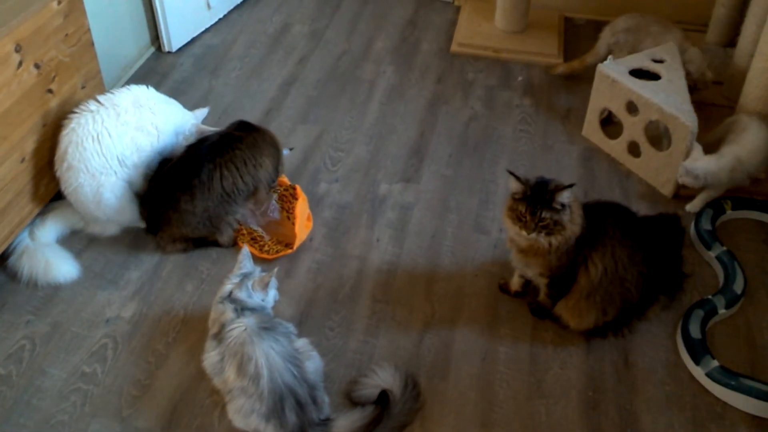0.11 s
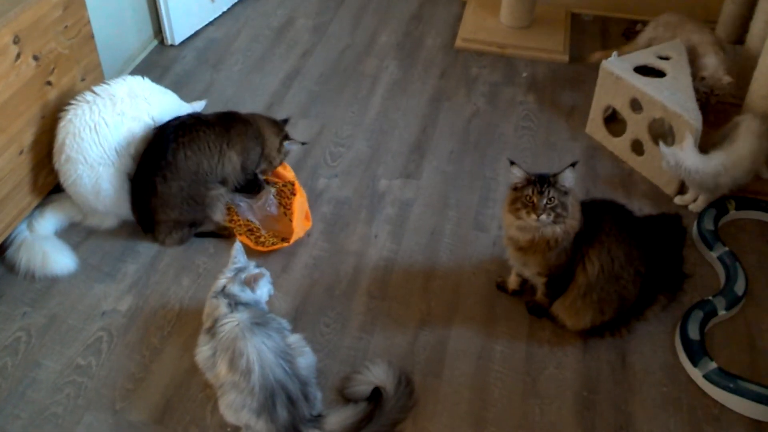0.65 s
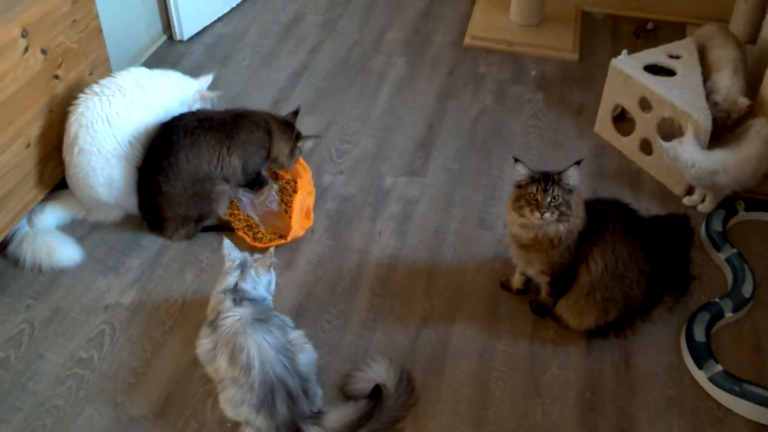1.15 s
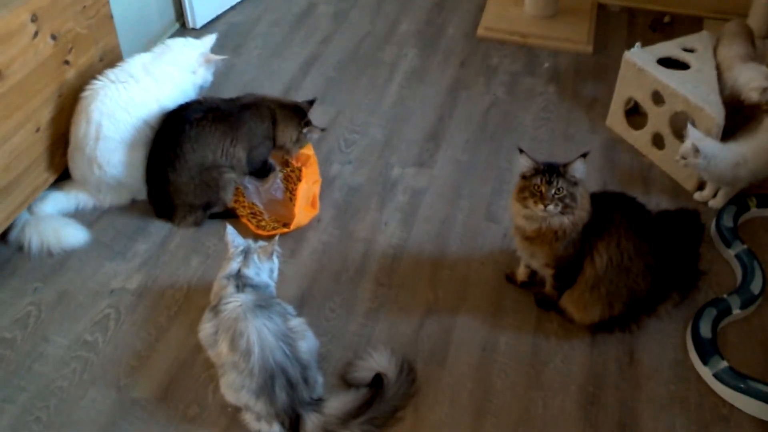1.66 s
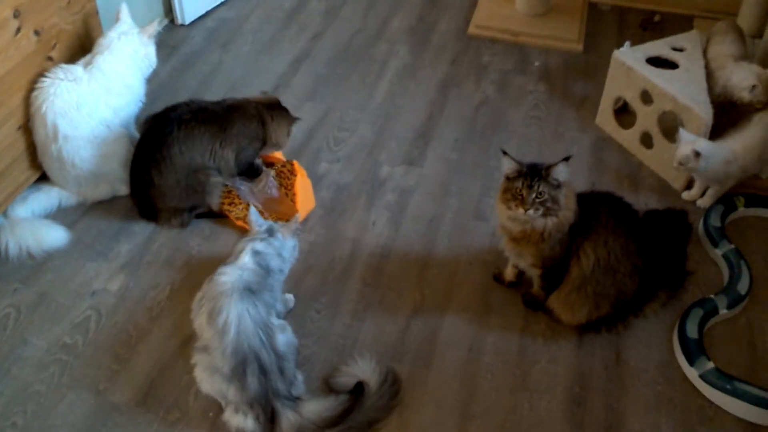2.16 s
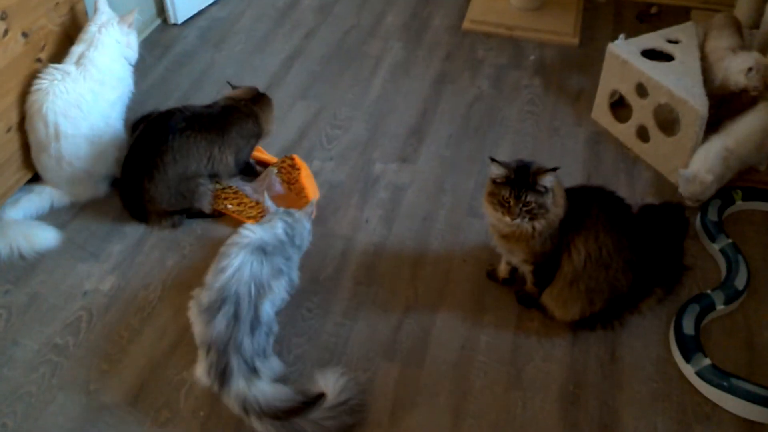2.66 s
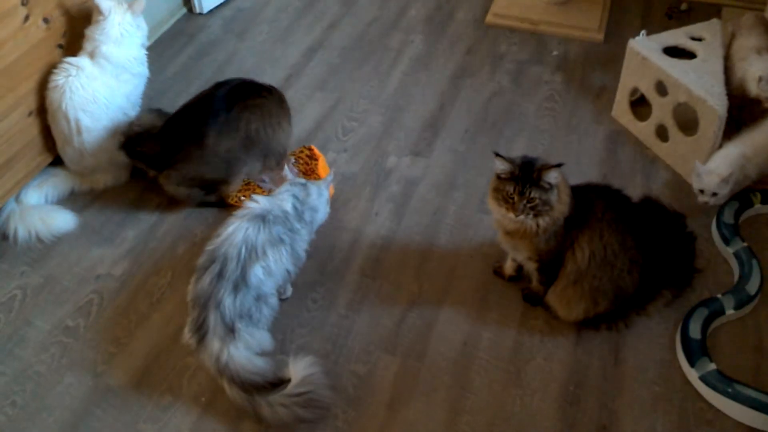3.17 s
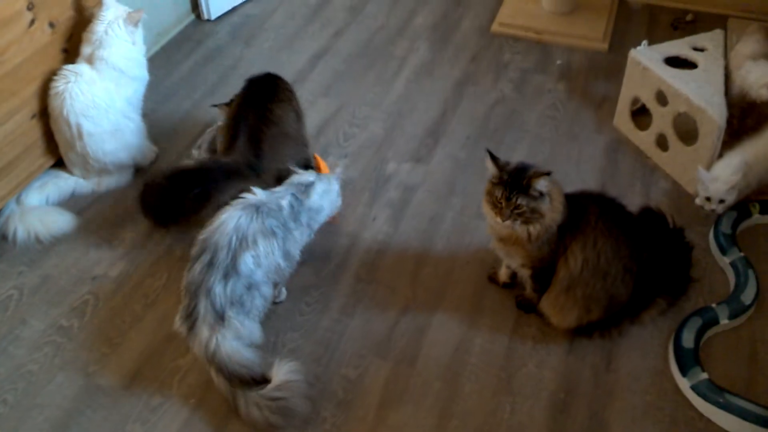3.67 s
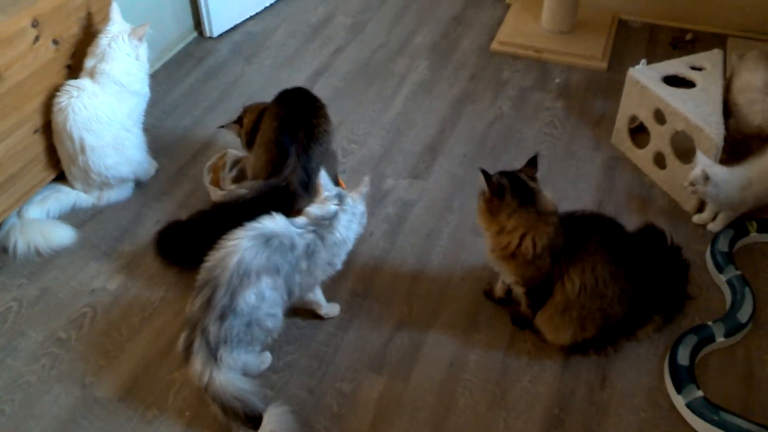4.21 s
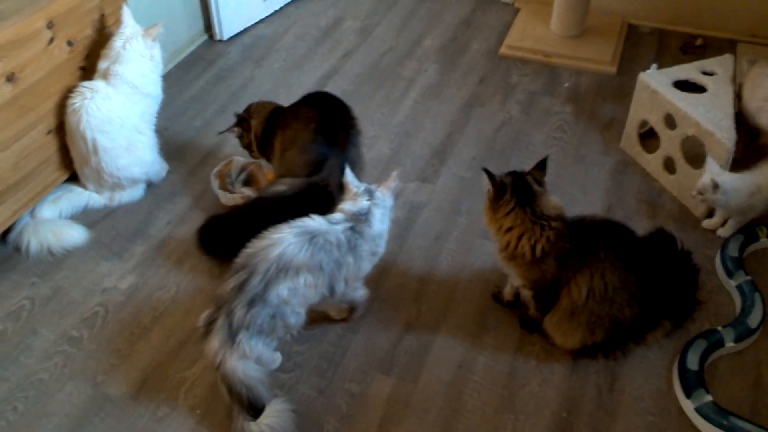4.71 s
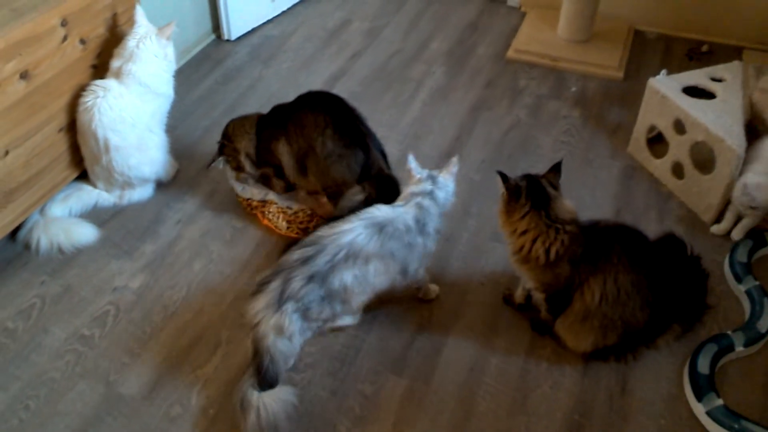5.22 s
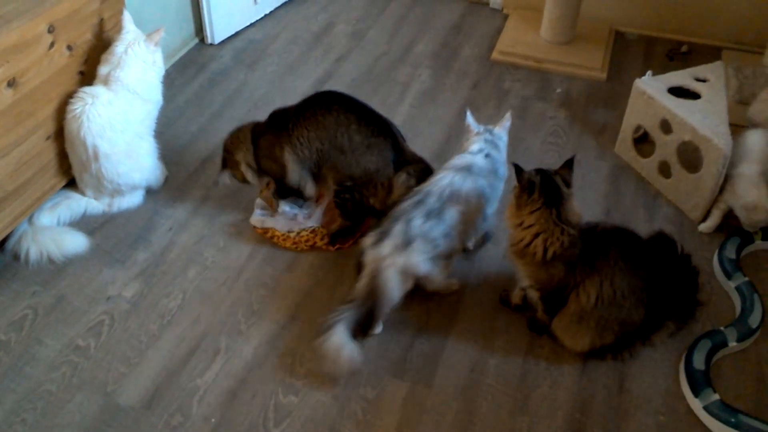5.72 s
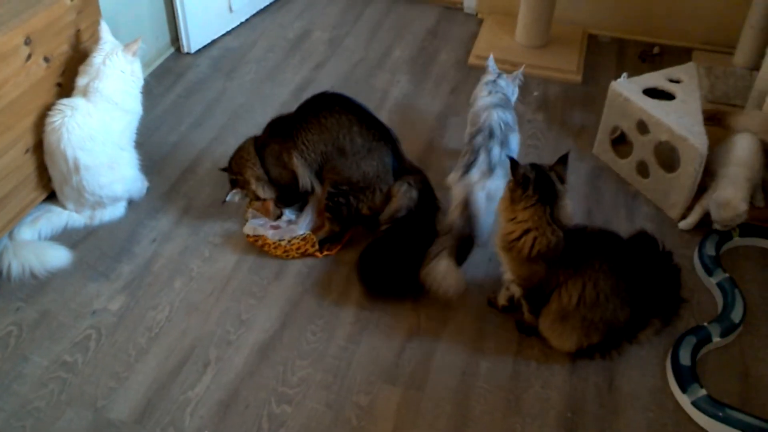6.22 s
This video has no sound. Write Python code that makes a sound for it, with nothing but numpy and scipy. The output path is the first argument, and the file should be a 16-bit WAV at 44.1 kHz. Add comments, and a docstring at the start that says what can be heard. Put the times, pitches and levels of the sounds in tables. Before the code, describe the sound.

In a small quiet room, a cat works at a crinkly fabric toy on a hard floor. Faint, patchy rustling comes first, then stronger irregular crackles with bright snaps, low cloth rubbing and muffled paw thuds. The liveliest bursts come near the end. A narrow-band mono microphone with noise suppression leaves a faint hum, clipped tails and a dull top.

```python
"""Cat on a crinkly toy

A cat paws and treads a crinkly fabric toy on a hard floor in a small room with a faint hum.
The film inside buckles: dense tiny cracks ring many small facets, and louder snaps ring a bright and a dull one.
The cloth drags as low-passed, dull noise, and padded paws thud on one low resonance of the boards.
A narrow-band mono microphone with a noise suppressor breaks weak sound into patches and cuts the tails."""
import sys
import numpy as np
from scipy import signal
from scipy.fft import rfft, irfft
from scipy.io import wavfile
from scipy.ndimage import uniform_filter1d

SR = 44100
rng = np.random.default_rng(int(sys.argv[2]) if len(sys.argv) > 2 else 0)


def amplitude_ratio(level_db):
    """Convert a level in decibels to the matching linear amplitude (field) ratio."""
    exponent = np.asarray(level_db, float) / 20
    return 10 ** exponent


def materialize(psi):
    """Save the field psi as 16-bit PCM at rate SR to the path in sys.argv[1].

    A 1-D psi becomes a single channel; in a 2-D psi each row is a channel.
    """
    bounded = np.clip(np.atleast_2d(psi).T, -1, 1)
    quanta = np.round(bounded * 32767).astype(np.int16)
    wavfile.write(sys.argv[1], SR, quanta)


N = 280035

# room tone spectrum: (frequency [Hz], relative density [dB per Hz])
HUM_SPECTRUM = [(53, -58.5), (90, -26), (140, 8.5), (291, 2.5), (469, -2.5), (890, -0.5), (976, -4.5),
                (2720, -5.5), (5990, -1.5), (7200, -3), (9360, -20), (15800, -120)]
# padded paws bump the boards: (time [s], dry peak level [dB], resonance [Hz])
PAW_BUMPS = [(0.034, -56.5, 307), (0.55, -55, 352), (0.744, -55.5, 148), (0.801, -54, 148),
             (0.874, -46.5, 156), (0.94, -50, 155.6), (1.148, -52, 259), (1.22, -49.5, 309),
             (1.348, -54, 151.5), (1.491, -38, 153), (1.591, -42.5, 275), (1.778, -30, 288),
             (1.969, -42, 260), (2.391, -35, 153), (2.55, -32, 151), (2.813, -46, 307), (2.956, -34.5, 184),
             (3.102, -32.5, 290), (3.373, -39.5, 143), (3.639, -38, 320), (3.732, -33, 168),
             (4.051, -35.5, 312), (4.149, -35, 416), (4.992, -36, 274), (5.12, -53, 291), (5.513, -25, 320),
             (5.587, -41, 238), (5.669, -43.5, 260), (6.057, -37, 280)]
# a paw or nose presses the toy:
# (time of full force [s], hold [s], film crackle level [dB], mid body re crackle [dB], cloth drag re crackle [dB])
TOY_PRESSES = [(0.033, 0.026, -51.5, -8, -8.5), (0.151, 0.072, -51, 4.5, -14.5),
               (0.249, 0.056, -49.5, 1.5, -20), (0.353, 0.069, -52.5, 4.5, -12.5),
               (0.432, 0.07, -56, -1, -7.5), (0.51, 0.045, -58, 2.5, -3), (0.599, 0.13, -65.5, -4.5, -8.5),
               (0.806, 0.037, -45, -6, -19), (0.894, 0.021, -49.5, -1.5, -8.5),
               (1.148, 0.011, -59, -6.5, -0.5), (1.496, 0.0035, -65.5, 10.5, 7.5),
               (1.567, 0.022, -45.5, -1, -4.5), (1.599, 0.012, -44.5, -4.5, -13),
               (1.728, 0.092, -36.5, -0.5, -7), (1.789, 0.099, -33.5, -2.5, -11),
               (1.928, 0.046, -37, 0.5, -18), (1.969, 0.025, -31, -4.5, -13), (2.028, 0.058, -46, -6, -5.5),
               (2.135, 0.13, -48.5, -0.5, -6.5), (2.201, 0.11, -36, -3.5, -15),
               (2.328, 0.099, -31, -2, -20), (2.465, 0.14, -36, -3, -11), (2.821, 0.12, -48.5, -5, -7.5),
               (2.95, 0.086, -39.5, -3.5, -13.5), (3.067, 0.086, -42.5, 0.5, -10),
               (3.337, 0.067, -47, 9, -6.5), (3.38, 0.066, -39.5, -1.5, -21.5),
               (3.615, 0.016, -40, -6, -13), (3.649, 0.1, -30.5, -4.5, -20), (3.731, 0.053, -28, -5, -18),
               (3.964, 0.05, -45.5, 7.5, -9.5), (4.021, 0.083, -25, -3.5, -19),
               (4.11, 0.038, -31.5, -1.5, -15), (4.198, 0.054, -43.5, -1.5, -10.5),
               (4.348, 0.1, -55.5, -7.5, -8), (4.597, 0.015, -49.5, -1, -9), (4.68, 0.025, -34, -10, -30.5),
               (4.754, 0.008, -44.5, -10, -22.5), (4.8, 0.1, -56, -5.5, -7), (4.933, 0.048, -40.5, -2, -19),
               (4.997, 0.038, -26, -3.5, -20), (5.108, 0.075, -52.5, 0.6, -17.5),
               (5.242, 0.08, -52, -12.5, -11.5), (5.336, 0.045, -44.5, -1.5, -11),
               (5.393, 0.08, -26, -4.5, -19), (5.487, 0.17, -23, -4.5, -23.5),
               (5.682, 0.074, -30, -4.5, -30), (5.758, 0.056, -33, -5, -38), (5.962, 0.0024, -33, -6, -20),
               (5.999, 0.05, -30, -5.5, -21.5), (6.056, 0.061, -39, -2.8, -9.5),
               (6.178, 0.12, -59, -4.5, -18.5)]
# film buckles: (time [s], bright level before a common trim [dB], bright facet [Hz], dull facet [Hz],
# dull re bright level [dB])
FILM_SNAPS = [(0.033, -38.5, 4680, 1700, -11.5), (0.1, -48.5, 4950, 856, 4.5), (0.129, -42, 6870, 837, 1),
              (0.152, -40, 3320, 815, 0.2), (0.179, -30.5, 5230, 1920, -2.5),
              (0.246, -32.5, 4500, 760, -7.5), (0.344, -40.5, 6680, 1780, -7.5),
              (0.375, -46, 6440, 1305, 7.5), (0.69, -48.5, 2310, 1190, -1.5), (0.724, -56, 5000, 713, 11),
              (0.798, -31, 4980, 2440, -5.5), (0.83, -46, 3660, 845, 11.5),
              (1.139, -40.5, 5940, 880, -25.5), (1.485, -48, 4050, 825, 11), (1.553, -36, 6000, 824, -1),
              (1.687, -38.5, 4400, 2070, -13.5), (1.735, -33.5, 5450, 884, 8),
              (1.8, -24.5, 5470, 1700, -1.5), (1.916, -24, 6170, 860, 2), (1.98, -20.5, 5420, 1670, -15.5),
              (2.184, -38, 4180, 536, 3.5), (2.295, -26.5, 2960, 820, 2.5), (2.36, -23, 5200, 2140, -9.5),
              (2.55, -26.5, 5100, 1514, -25.5), (2.811, -39, 3080, 676, 4.5),
              (2.931, -34.5, 5270, 685, 1.5), (2.998, -31, 6500, 874, -1), (3.064, -25, 5230, 1850, -9.5),
              (3.325, -44.5, 3140, 1010, 7), (3.603, -35, 3630, 1580, 4), (3.648, -19.5, 6920, 2280, -13.5),
              (3.753, -15.5, 5910, 2070, -9.5), (3.942, -51, 3290, 1033, 8), (4.305, -26.5, 6150, 880, -30),
              (4.33, -31, 6820, 870, -25.5), (4.642, -36, 5800, 1620, -26.5),
              (4.666, -24.5, 5800, 956, -15.5), (4.7, -38.5, 3530, 911, 6.5),
              (4.753, -33.5, 6190, 2120, -16.5), (4.893, -37, 5890, 887, -17),
              (4.941, -34.5, 6260, 720, 4.5), (5.02, -18.5, 5100, 3200, -4.5),
              (5.176, -37, 3500, 1755, -15.5), (5.243, -35, 6040, 1653, -11.5),
              (5.304, -38.5, 6390, 1750, -10.5), (5.356, -30.5, 3160, 1760, 2.5),
              (5.412, -16.5, 6550, 2800, -13.5), (5.504, -25, 5300, 2700, 1), (5.904, -45, 6200, 2130, -11),
              (5.943, -27.5, 6760, 2320, -2.5), (5.998, -19, 6440, 2570, -7),
              (6.038, -22, 5740, 1114, -7.5), (6.304, -39.5, 6700, 655, -17.5)]
# colour of the cracks: (frequency [Hz], relative density [dB per Hz])
CRACK_SPECTRUM = [(290, -34), (500, -4), (1010, 1), (1080, -2.5), (2150, -3.5), (2680, -4.5), (4030, -5.5),
                  (5020, -2.5), (6900, -3.5), (8970, -33), (15200, -120)]


def rms_one(x):
    """Normalisation: a signal divided by its root mean square has rms 1."""
    return x / np.sqrt(np.mean(x ** 2) + 1e-20)


def at_hz(points, hz):
    """Interpolation: a spectrum in dB is read on a logarithmic frequency axis."""
    point_hz, point_db = np.array(points).T
    return np.interp(np.log(hz), np.log(point_hz), point_db)


def drift(rate_hz):
    """Random modulation: white noise through two equal low-pass poles wanders slowly with rms 1."""
    step = 40   # samples between computed points
    pole = np.exp(-2 * np.pi * rate_hz * step / SR)
    noise = rng.standard_normal(N // step + 2002)
    slow = signal.lfilter([1], [1, -2 * pole, pole * pole], noise)[2000:]   # skip the filter's start
    return np.interp(np.arange(N) / step, np.arange(len(slow)), rms_one(slow))


def ring(clicks, hz, t60_s):
    """Damped resonance: a unit click sets off a sine of initial height 1 that decays 60 dB in t60_s."""
    radius = amplitude_ratio(-60 / (t60_s * SR))
    angle = 2 * np.pi * hz / SR
    feedback = [1, -2 * radius * np.cos(angle), radius * radius]
    return signal.lfilter([0, np.sin(angle)], feedback, clicks + 1e-18)


def hum():
    """Stationary noise: random phases and amplitudes under a fixed spectrum give a room tone that wavers a little."""
    level_db, waver_db = -52.5, 0.8
    hz = np.fft.rfftfreq(N, 1 / SR) + 1
    colour = amplitude_ratio(at_hz(HUM_SPECTRUM, np.minimum(hz, 7000)))
    tone = rms_one(irfft(rfft(rng.standard_normal(N)) * colour, N))
    return amplitude_ratio(level_db + waver_db * drift(1)) * tone


def room(x):
    """Diffuse reverberation: dense reflections die away exponentially, dulled by the walls."""
    t60_s, wall_cut_hz, first_s = 0.25, 6800, 0.004
    t = np.arange(SR // 2) / SR
    tail = rng.standard_normal(len(t)) * amplitude_ratio(-60 * t / t60_s) * (t > first_s)
    tail = signal.lfilter(*signal.butter(1, wall_cut_hz, fs=SR), tail)
    tail = tail / np.sqrt(np.sum(tail ** 2))   # unit energy
    return signal.fftconvolve(x, tail)[:N]


def bumps():
    """Soft impact: each footfall is a short puff of noise through one low resonance of the boards."""
    rise_s, fall_s, width_hz = 0.007, 0.011, 34   # width of the resonance, approximate
    length = 6000
    out, t = np.zeros(N + length), np.arange(length) / SR
    shape = (1 - np.exp(-t / rise_s)) * np.exp(-t / fall_s)
    for s, peak_db, hz in PAW_BUMPS:
        puff = rng.standard_normal(length) * shape
        thud = ring(puff, hz, 2 / width_hz)
        at = round(s * SR)
        out[at:at + length] += amplitude_ratio(peak_db) * thud / np.abs(thud).max()
    return out[:N]


def force():
    """Power addition: presses rise, hold, fall and settle, and sum to levels in dB of crackle, body and drag."""
    rise_db_per_s, fall_db_per_s = 548.5, 455.5   # the force builds and lets go
    settle_db, settle_db_per_s = -20, 64.5   # then the creased film creeps back, faintly
    t = np.arange(N // 40 + 1) * 40 / SR
    power = np.full((3, len(t)), 1e-12)
    for s, held_s, crackle_db, body_db, drag_db in TOY_PRESSES:
        after = np.maximum(t - s - held_s, 0)
        rise = rise_db_per_s * (t - s)
        fall = np.maximum(-fall_db_per_s * after, settle_db - settle_db_per_s * after)
        shape_db = np.minimum(rise, fall)
        parts_db = crackle_db + np.array([[0], [body_db], [drag_db]])
        power += amplitude_ratio(2 * (parts_db + shape_db))   # twice the dB turns amplitude into power
    return [np.interp(np.arange(N) / SR, t, 10 * np.log10(p)) for p in power]


def cloth(drag_db):
    """Friction noise: padded cloth and paws drag on the boards with a slightly lumpy low rub."""
    low_hz, high_hz, lump_db = 130, 370.4, 1.5
    band = signal.butter(4, [low_hz, high_hz], "band", fs=SR, output="sos")
    rub = rms_one(signal.sosfilt(band, rng.standard_normal(N)))
    return amplitude_ratio(drag_db + lump_db * drift(11)) * rub


def snaps():
    """Buckling: each snap is a quick spray of cracks on a small bright facet and a larger dull one."""
    spray_s, rise_s, width_hz, trim_db = 0.018, 0.0024, 300, -9.0   # width of each resonance, approximate
    length = 4000
    out, t = np.zeros(N + length), np.arange(length) / SR
    shape = (1 - np.exp(-t / rise_s)) * np.exp(-t / spray_s)
    for s, bright_db, bright_hz, dull_hz, dull_db in FILM_SNAPS:
        bright = rms_one(ring(rng.standard_normal(length), bright_hz, 2 / width_hz))
        dull = rms_one(ring(rng.standard_normal(length), dull_hz, 2 / width_hz))
        at = round(s * SR)
        out[at:at + length] += amplitude_ratio(bright_db + trim_db) * (bright + amplitude_ratio(dull_db) * dull) * shape
    return out[:N]


def film(crackle_db, body_db):
    """Crackling noise: clumped cracks each ring a small facet, and facets wake and fall still on their own."""
    cracks_per_s, clump_db, size_spread_db = 6500, 1.5, 1.1   # rate before clumping
    ring_t60_s, split_hz = 0.03, 3200
    patchy_db, full_db, patch_rate_hz = 5.2, -22.0, 13.5
    # a hard crush wakes all facets alike, a light touch only some
    uneven_db = patchy_db * np.clip((full_db - crackle_db) / 20, 0.3, 1)
    sizes = amplitude_ratio(size_spread_db * np.minimum(rng.exponential(1, N), 5)) * rng.choice([-1, 1], N)
    born = rng.random(N) < cracks_per_s * amplitude_ratio(clump_db * drift(40)) / SR
    facet_hz = np.linspace(560, 8100, num=44)
    dealt = rng.integers(0, len(facet_hz), N)   # which facet a crack strikes
    high, mid = 0, 0
    for k, hz in enumerate(facet_hz):
        facet = rms_one(ring(sizes * born * (dealt == k), hz, ring_t60_s))
        colour_db = at_hz(CRACK_SPECTRUM, min(hz, 6900))
        facet = facet * amplitude_ratio(colour_db + uneven_db * drift(patch_rate_hz))
        if hz > split_hz:
            high = high + facet
        else:
            mid = mid + facet
    return amplitude_ratio(crackle_db) * rms_one(high) + amplitude_ratio(body_db) * rms_one(mid)


def scene():
    """Superposition: the toy, its reflections and the room tone add up, alike on both sides."""
    room_db = -11
    crackle_db, body_db, drag_db = force()
    toy = bumps() + cloth(drag_db) + snaps() + film(crackle_db, body_db)
    mix = hum() + amplitude_ratio(room_db) * room(toy) + toy
    return np.tile(mix, (2, 1))


def suppress(x):
    """Spectral subtraction: frames lose what lies near the learnt noise, leaving patches and cut tails."""
    size, hop = 704, 176   # samples
    oversubtract, memory, follow, follow_s = 3, 0.58, 0.17, 0.6
    depth_db, ease_db, wake_db, ease_span_db = -11.5, 3.5, -6, 0.5
    frames = signal.stft(x, nperseg=size, noverlap=size - hop)[2]
    power = uniform_filter1d(np.abs(frames) ** 2, size=3, axis=0)
    power = signal.lfilter([1 - memory], [1, -memory], power, axis=1)
    power = np.roll(power, -1, axis=1)   # one hop of look-ahead
    steady = uniform_filter1d(np.percentile(power, 15, axis=1), size=3)[:, None]
    # a lasting rustle is partly mistaken for noise
    slow = np.exp(-hop / SR / follow_s)
    broad = uniform_filter1d(power, size=15, axis=0)
    lasting = signal.lfilter([1 - slow], [1, -slow], broad, axis=1)
    noise = oversubtract * steady + follow * lasting
    # it eases its grip when the band of about 0.5 to 7 kHz rises towards the learnt noise
    rise_db = 10 * np.log10(np.mean(power[8:112] / noise[8:112], axis=0))
    eased_db = ease_db * np.tanh(np.maximum(rise_db - wake_db, 0) / ease_span_db)
    floor = amplitude_ratio(depth_db + eased_db)
    gain = np.maximum(1 - noise / (power + 1e-20), floor)
    return signal.istft(frames * gain, nperseg=size, noverlap=size - hop)[1][:N]


def top_cut(x):
    """Nothing passes above the cut-off."""
    return signal.sosfilt(signal.butter(12, 8300, fs=SR, output="sos"), x)


def record(dry):
    """Band limiting: the suppressed mono signal passes steep low and high edges, then fills both channels."""
    low_cut_hz, high_cut_hz = 115, 7063
    x = suppress(dry[0])
    x = signal.sosfilt(signal.butter(8, low_cut_hz, "high", fs=SR, output="sos"), x)
    x = signal.sosfilt(signal.butter(20, high_cut_hz, fs=SR, output="sos"), x)
    mix = np.tile(x, (2, 1))
    return top_cut(mix)


dry = scene()
out = record(dry)
materialize(out)
```